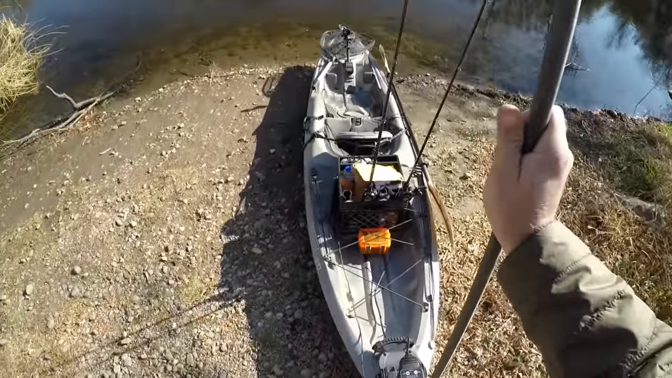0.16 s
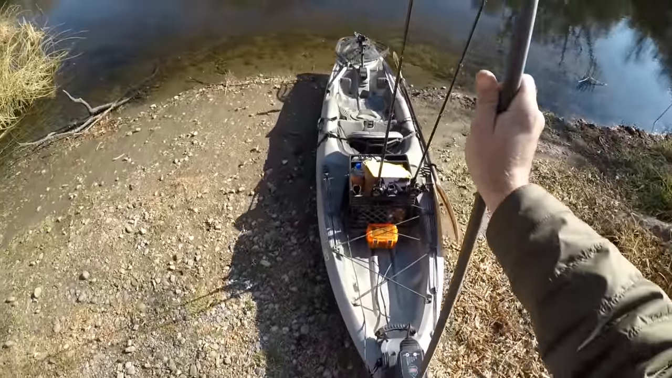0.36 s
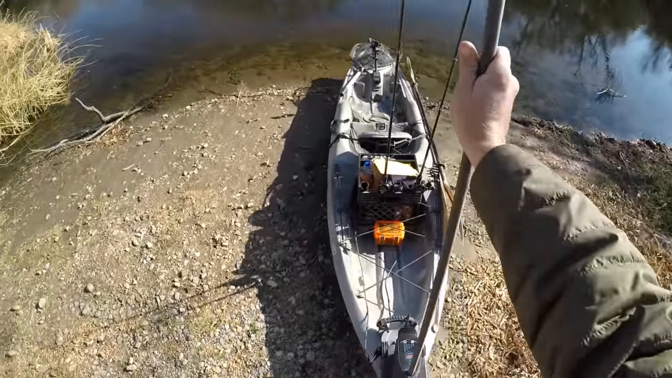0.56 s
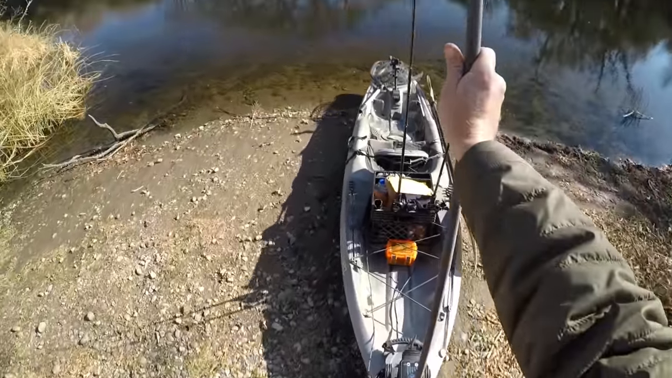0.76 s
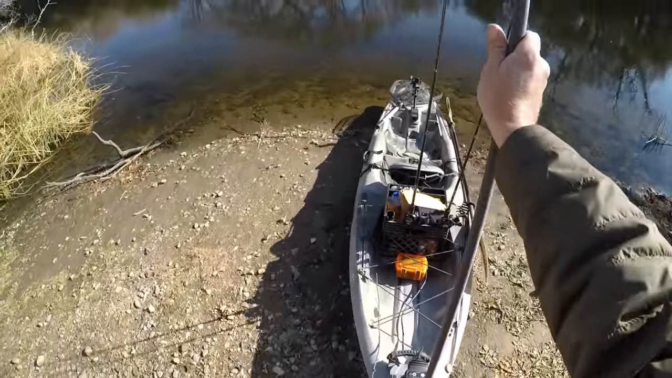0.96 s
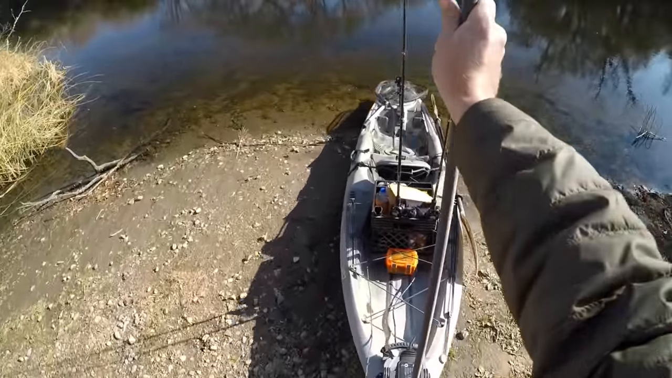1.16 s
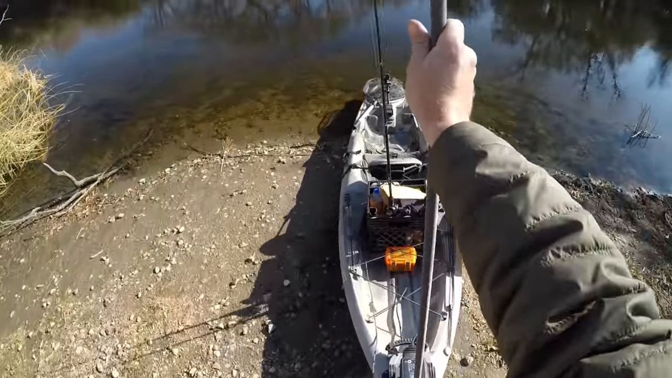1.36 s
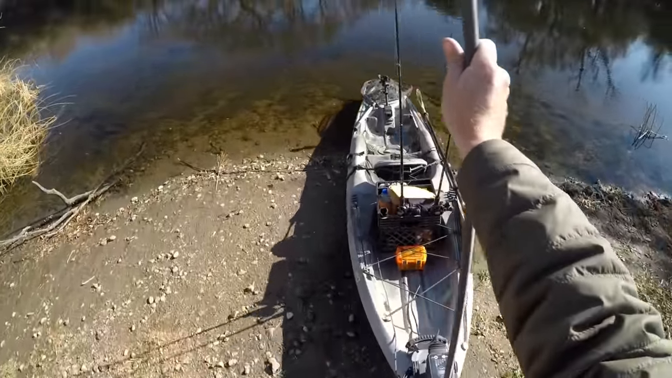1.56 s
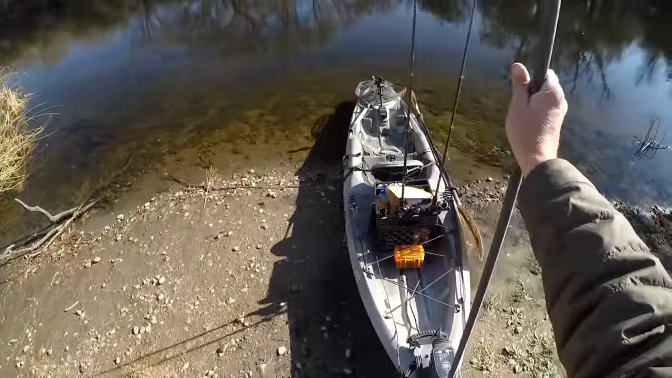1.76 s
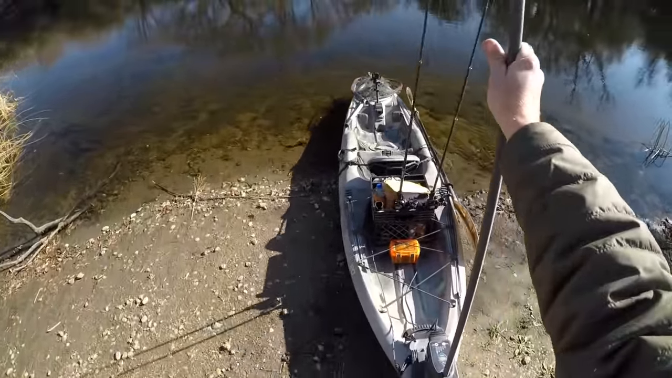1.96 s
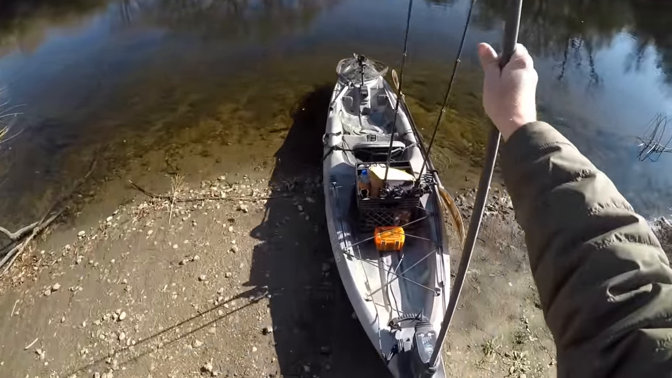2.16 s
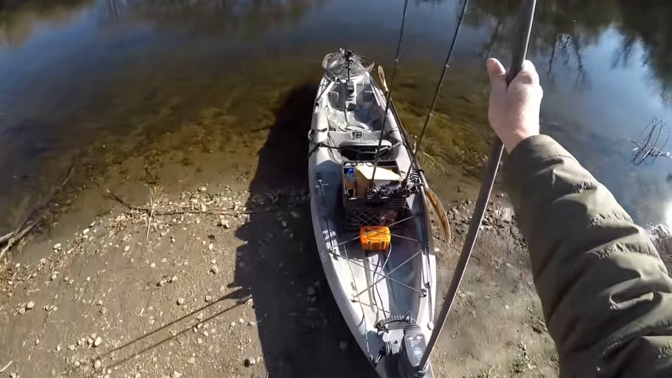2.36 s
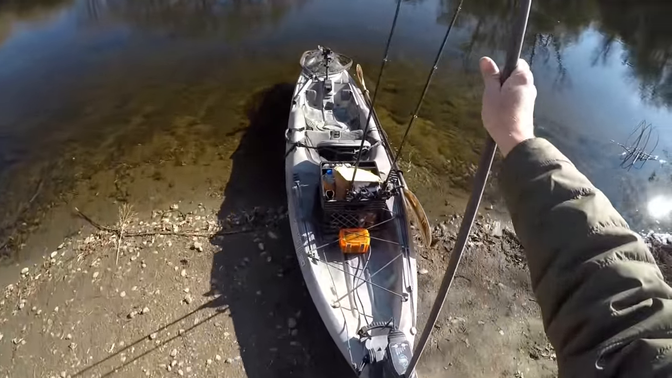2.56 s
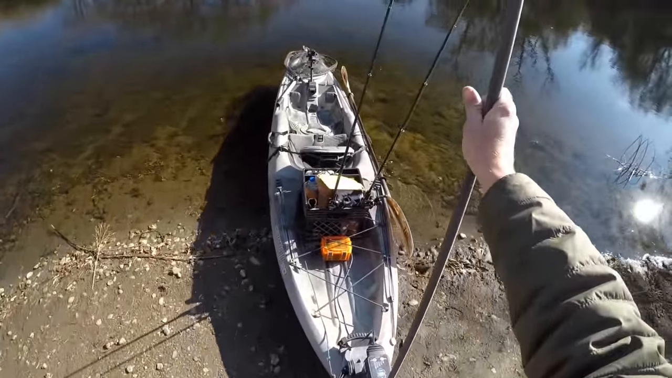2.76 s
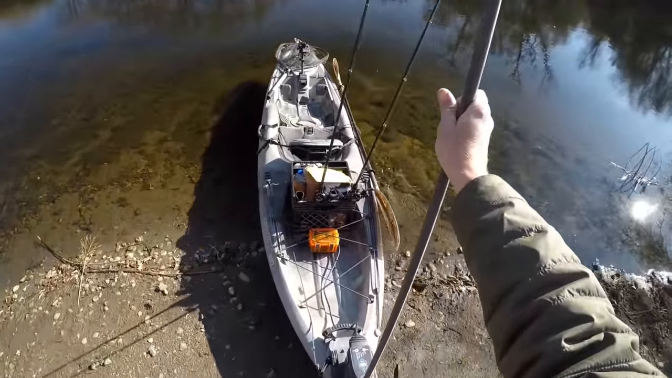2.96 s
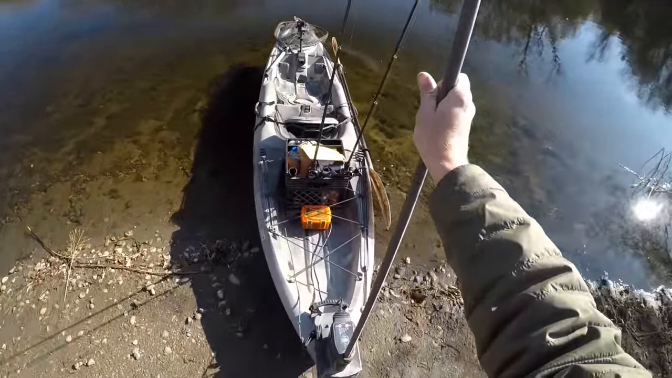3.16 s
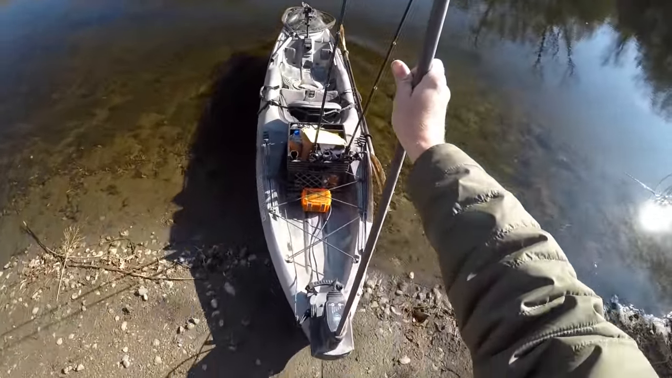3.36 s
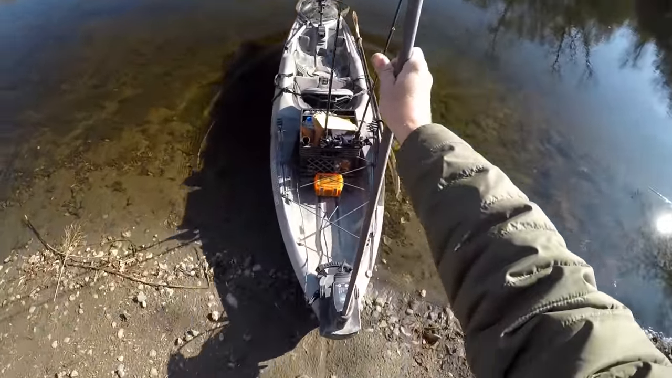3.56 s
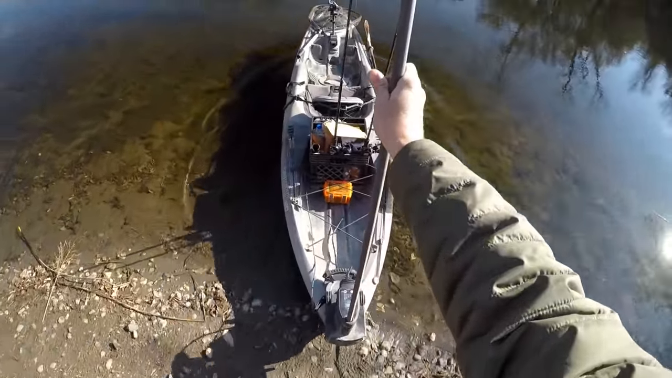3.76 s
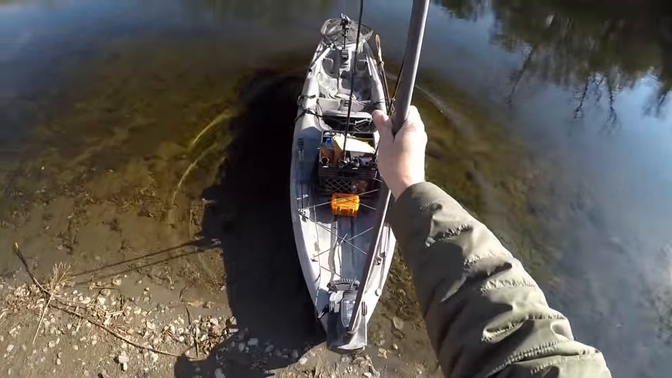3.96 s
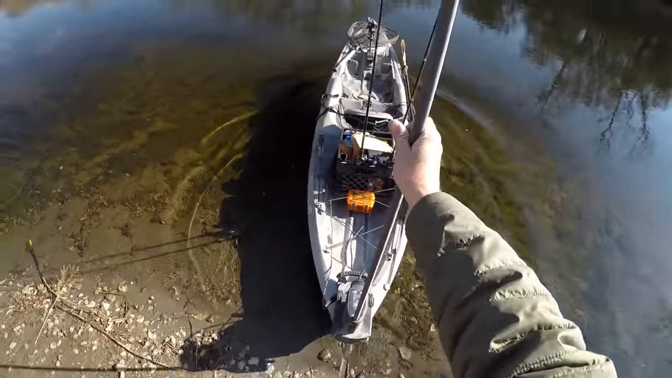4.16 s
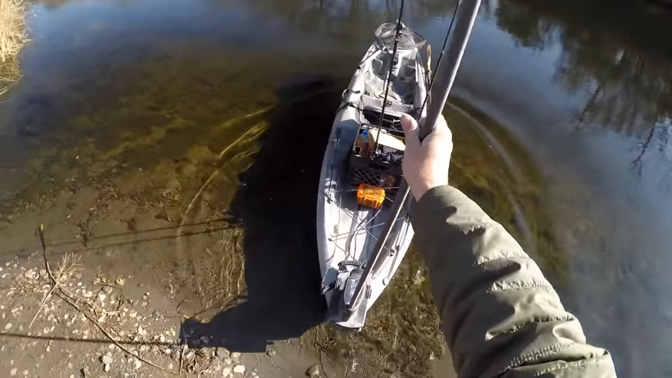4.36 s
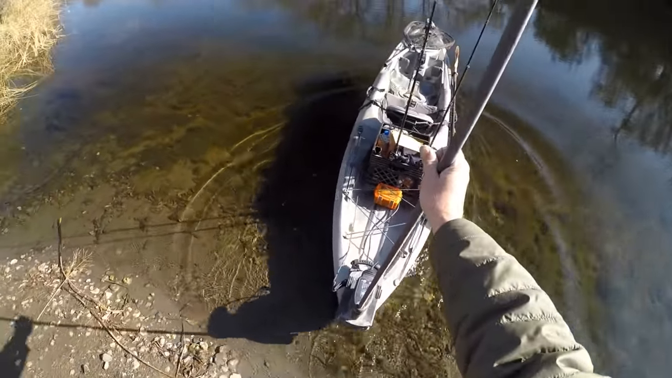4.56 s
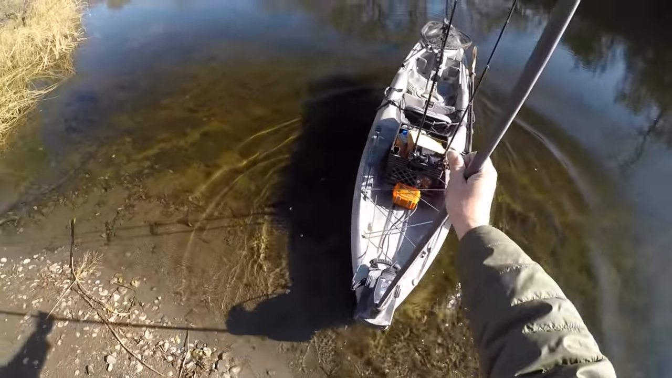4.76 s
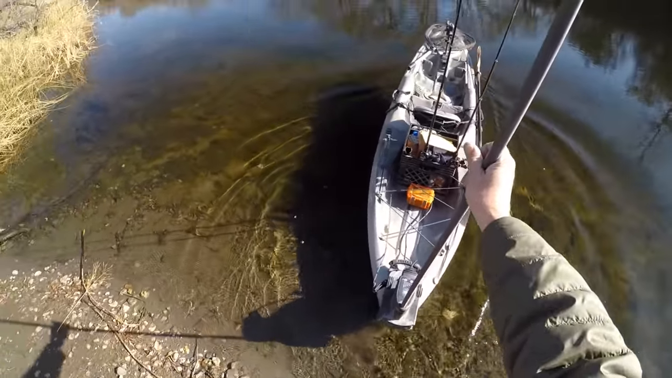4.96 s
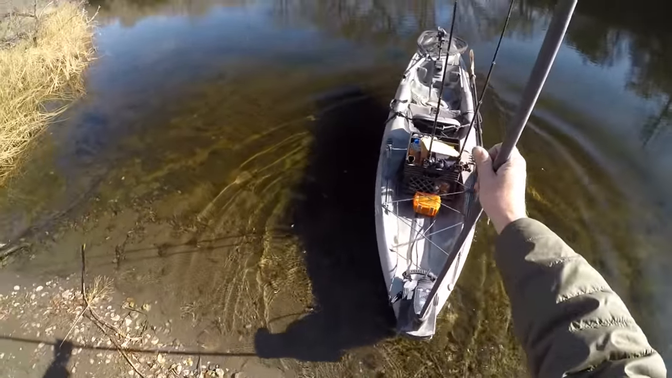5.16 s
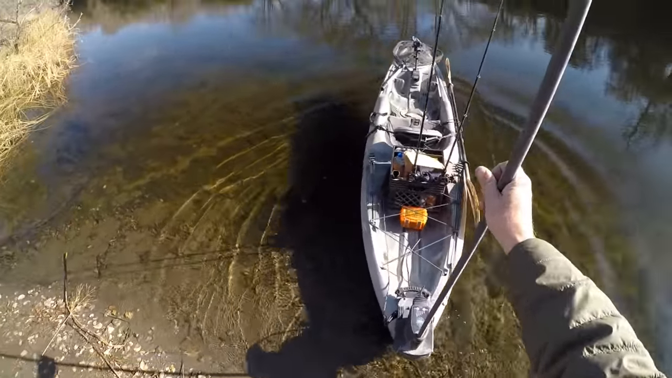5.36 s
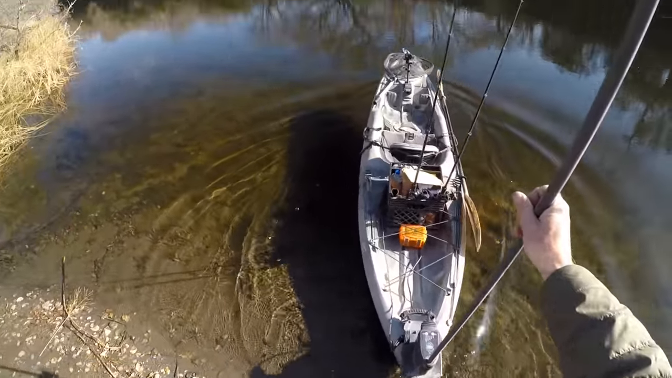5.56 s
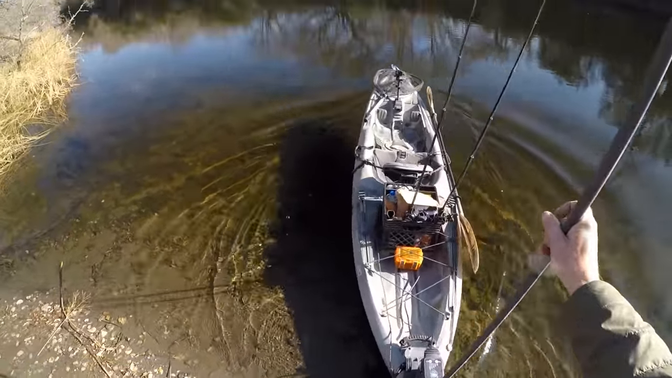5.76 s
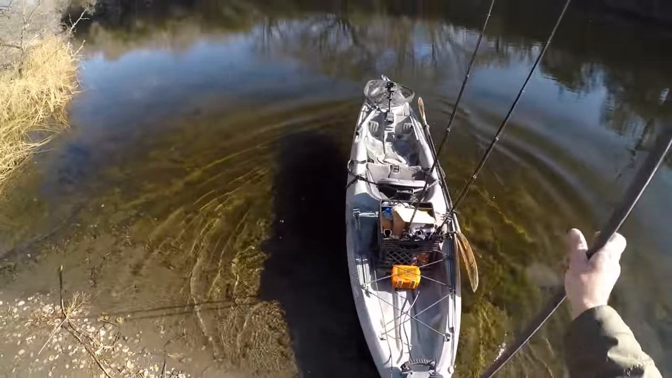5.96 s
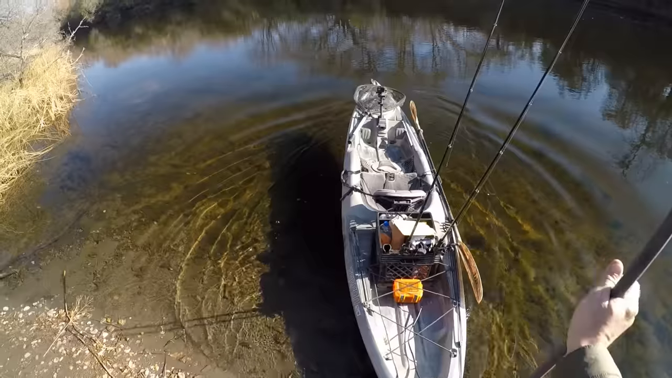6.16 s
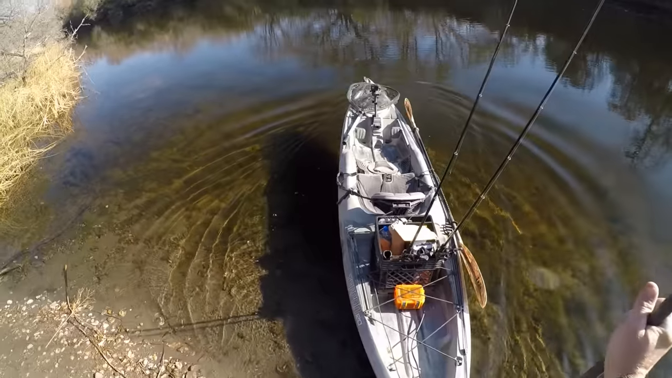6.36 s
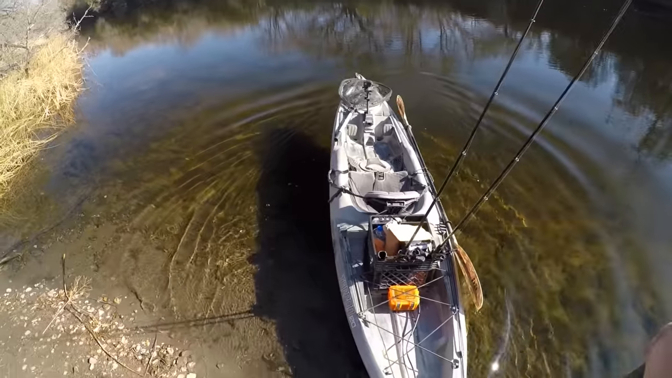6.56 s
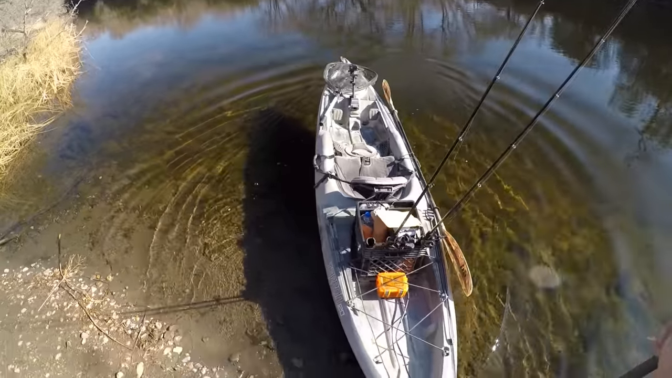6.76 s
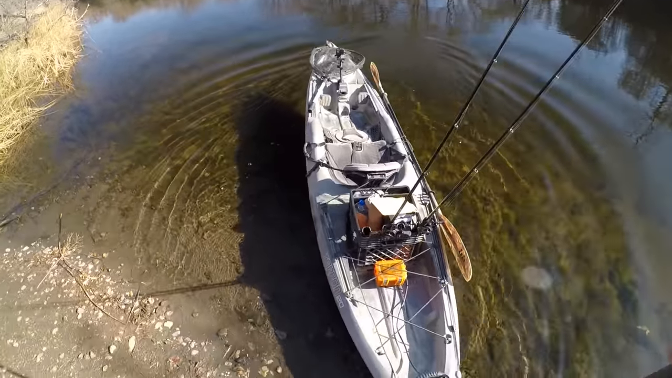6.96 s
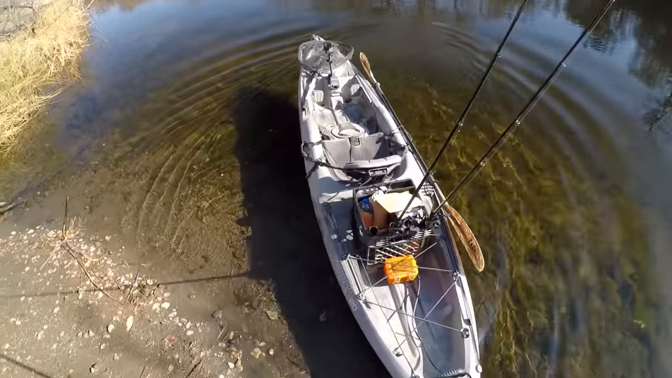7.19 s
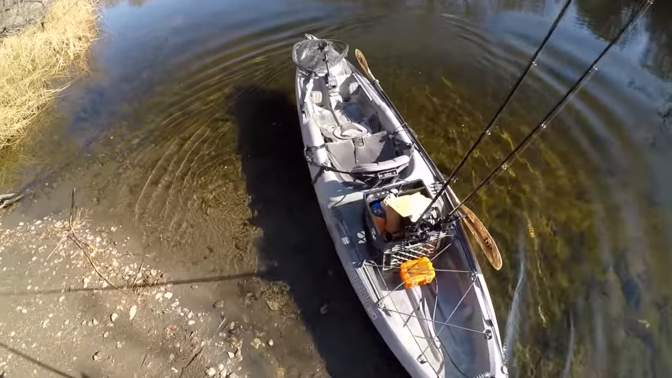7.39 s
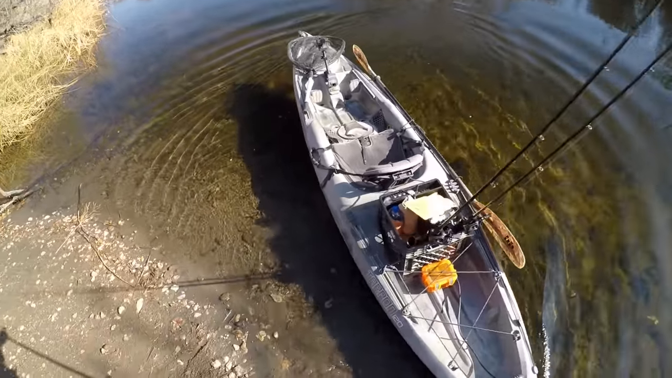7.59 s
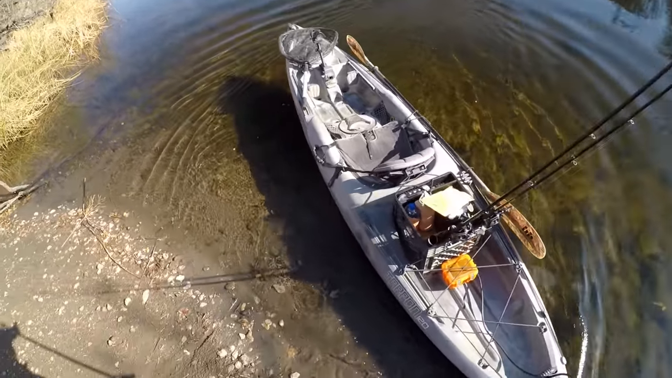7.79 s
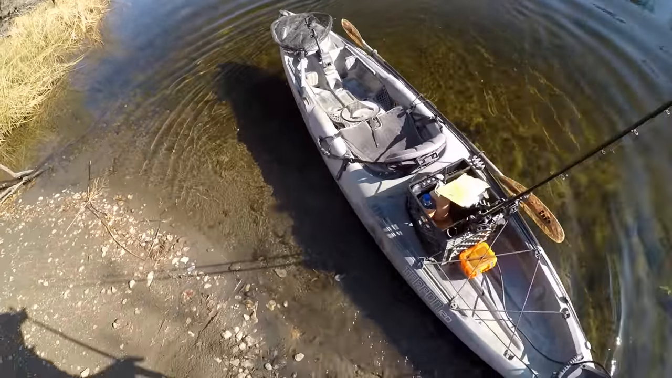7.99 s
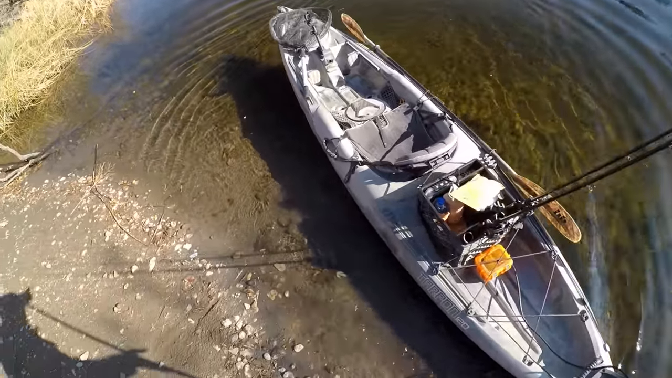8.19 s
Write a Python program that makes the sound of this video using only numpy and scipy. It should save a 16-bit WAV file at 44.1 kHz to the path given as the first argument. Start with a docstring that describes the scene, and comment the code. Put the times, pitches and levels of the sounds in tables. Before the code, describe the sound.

Close gritty scraping of a plastic boat shoved down a stony bank, with booming knocks, gives way to quiet bubbling water and light taps.

```python
"""Kayak launched over gravel

A plastic kayak is shoved over a gravel bank into a river, close to the microphone.
Random impacts drum on the modes of the hollow hull, crunch as filtered grit and hiss as sand.
A sleeve swishes as noise strokes and gear ticks as short bursts; plops, drips and gurgles are decaying
sines, hull knocks ring its modes, and a low hum wavers over the noise floor of the open air."""
import sys
import numpy as np
from scipy import signal
from scipy.fft import rfft, irfft
from scipy.io import wavfile
from scipy.ndimage import uniform_filter1d

SR = 44100
rng = np.random.default_rng(int(sys.argv[2]) if len(sys.argv) > 2 else 0)


def dump(signal):
    """Clip the signal to [-1, 1] and save it as 16-bit WAV at the path in sys.argv[1]."""
    limited = np.clip(np.atleast_2d(signal).T, -1, 1)
    pcm = np.round(limited * 32767).astype(np.int16)
    wavfile.write(sys.argv[1], SR, pcm)


N = 362807
TIME = np.arange(N) / SR


def gain_of(db):
    """Decibels to amplitude."""
    return 10 ** (np.asarray(db) / 20)


def evened(x):
    """Scales to rms 1."""
    return x / np.sqrt(np.mean(x ** 2) + 1e-20)


def peaked(x):
    """Scales to peak 1."""
    return x / (abs(x).max() + 1e-20)


def steadied(x, size=4000):
    """Holds the running rms at 1 while keeping the fine grain."""
    return x / np.sqrt(abs(uniform_filter1d(x ** 2, size)) + 1e-12)


def add(mix, s, sound):
    """Mixes a sound in at time s."""
    part = mix[max(round(s * SR), 0):][:len(sound)]
    part += sound[:len(part)]


def follow(breakpoints):
    """Straight lines through (time, value) points, over the whole scene."""
    return np.interp(TIME, *np.transpose(breakpoints))


def coloured(x, spectrum, size=4096):
    """Causal minimum-phase filter with the given spectrum, so that clicks keep their sharp fronts."""
    hz, db = np.transpose(spectrum)
    bin_hz = abs(np.fft.fftfreq(size, 1 / SR))
    log_gain = np.log(gain_of(np.interp(np.log(bin_hz + 1), np.log(hz), db)))
    taps = np.fft.ifft(np.exp(np.conj(signal.hilbert(log_gain)))).real
    return signal.oaconvolve(x, taps[:size // 2])[:len(x)]


def wander(hz):
    """Random drift of rms 1, up to about the given rate."""
    lowpass = np.exp(-(np.fft.rfftfreq(N, 1 / SR) / hz) ** 2)
    return evened(irfft(rfft(rng.standard_normal(N)) * lowpass, N))


def impacts(per_s, spread_db, cap=4):
    """Random one-sample impacts whose strengths spread exponentially in dB, up to a cap."""
    hits = (rng.random(N) < per_s / SR) * rng.choice([-1, 1], N)
    return hits * gain_of(spread_db * np.minimum(rng.exponential(1, N), cap))


def swell(start, length, rise_s, fall_s):
    """Attack, hold and release of one contact."""
    t = TIME - start
    return np.clip(t / rise_s, 0, 1) * np.exp(-np.maximum(t - length, 0) / fall_s)


def surging(steady, events, rise_s, fall_s):
    """A set of steady levels, with the power of each event on top."""
    power = sum(np.outer(gain_of(db), swell(start, length, rise_s, fall_s)) ** 2
                for start, length, *db in events)
    return np.sqrt(steady ** 2 + power)


def burst(spectrum, t60, rise_s=0.00008, size=4000):
    """A short crack of coloured, decaying noise with peak 1."""
    t = np.arange(size) / SR
    noise = rng.standard_normal(size) * gain_of(-60 * t / t60) * (1 - np.exp(-t / rise_s))
    return peaked(coloured(noise, spectrum))


def clack(hz, t60=0.016, spread=0.198, count=7, size=1500):
    """A cluster of close, quickly dying modes around one pitch."""
    t = np.arange(size) / SR
    modes = hz * np.exp(spread * rng.standard_normal((count, 1)))
    ring = (rng.choice([-1, 1], (count, 1)) * np.sin(2 * np.pi * modes * t)).sum(0)
    return peaked(ring * gain_of(-60 * t / t60))


def rattle(hz, count=3):
    """One clack, then a few weaker ones of other pitches close behind."""
    out = np.zeros(4000)
    add(out, 0, clack(hz, t60=0.018, spread=0.245, count=14))
    for late, pitch in rng.random((count, 2)):
        add(out, 0.011 * late, gain_of(-15) * clack(hz * 2 ** (1.3 * (pitch - .5))))
    return out


# low wavering drone of two tones: (frequency [Hz], relative level [dB], width [Hz])
HUM = [(135.5, -51.5, 2.6), (273, -52, 6.16)]
# slow fading of the drone: (time [s], level [dB])
FADE = [(4.7, -11), (5.15, -2), (5.45, -8), (5.65, -14.5), (6.1, -0.5), (6.35, -10), (6.53, -10),
        (6.8, -5.5), (7.4, -3.5), (8.2, -5)]
# colour of the open-air floor: (frequency [Hz], density [dB per Hz])
AIR = [(25, -20), (45, -36), (65, -8), (90, 7.5), (180, 4.5), (350, 5), (650, -14), (1500, -8.5),
       (3000, -15.5), (6000, -19.5), (10500, -21.5), (12500, -27)]


def air(drift=0.372):
    """Open-air noise floor with a low drone whose tones waver in pitch and level and fade."""
    hum = np.zeros(N)
    for hz, db, width in HUM:
        pitch = hz + drift * width * wander(width)
        tone = evened(np.sin(2 * np.pi * np.cumsum(pitch) / SR))
        hum += gain_of(db + 2 * wander(width)) * tone
    floor = gain_of(-55.0) * evened(coloured(rng.standard_normal(N), AIR))
    return hum * gain_of(follow(FADE)) + floor


# colour of stirred water: (frequency [Hz], density [dB per Hz])
WASH = [(150, -4.5), (380, 23.5), (900, 7), (1800, 8.5), (3500, 6), (6000, 4), (10000, -4.5), (12500, -27)]


def wash():
    """The stirred wake, a dense rain of impacts."""
    return evened(coloured(impacts(per_s=6000, spread_db=6.0), WASH))


# colour of the falling spray: (frequency [Hz], density [dB per Hz])
DROPLET = [(1500, -31), (3000, 0), (4500, -3), (7000, -2), (10000, -4.5), (13000, -18)]


def droplets(t60=0.006):
    """Fine spray from the wake falls back in tiny, separate ticks."""
    t = np.arange(400) / SR
    tick = rng.standard_normal(len(t)) * gain_of(-60 * t / t60)
    hits = signal.oaconvolve(impacts(per_s=38, spread_db=5.5, cap=2.8), tick)[:N]
    return gain_of(-9) * evened(coloured(hits, DROPLET))


def bubble(hz, t60, rise=0.09, onset_cycles=0.45):
    """A pocket of air rings and climbs by a share of its pitch as it nears the surface."""
    t = np.arange(0, t60, 1 / SR)
    turns = np.cumsum(hz * (1 + rise * t / t60)) / SR
    onset = 1 - np.exp(-turns / onset_cycles)
    return peaked(np.sin(2 * np.pi * turns) * gain_of(-60 * t / t60) * onset)


def patter(count=64):
    """Small bubbles at random; the smaller the bubble, the higher and shorter its ring."""
    out = np.zeros(N)
    for hz in np.geomspace(480, 5000, count):
        ring = (hz / 1000) ** -.15 * bubble(hz, 0.045 * (hz / 1000) ** -.5, rise=0.11)
        out += signal.oaconvolve(impacts(per_s=16, spread_db=6.0, cap=2.94), ring)[:N]
    # each wavelet frees a cluster of bubbles
    return steadied(out, size=9000) * gain_of(2.5 * wander(hz=30.0))


def glug(hz, hold, t60, size=8000):
    """A trapped pocket of air drops onto its pitch, rings on briefly and is let go, with an overtone."""
    t = np.arange(size) / SR
    turns = np.cumsum(hz * (1 + 0.14 * np.exp(-t / 0.006))) / SR  # starts sharp and settles
    ring = np.sin(2 * np.pi * turns) * gain_of(-60 * np.maximum(t - hold, 0) / t60)
    overtone = np.sin(2 * np.pi * 1.92 * hz * t) * gain_of(-60 * t / 0.034)
    return (ring + overtone) * (1 - np.exp(-2 * turns))


def spatter(length, hz, per_s=300, octaves=0.45):
    """A wavelet collapses into a quick crowd of tiny bubbles around one pitch."""
    out = np.zeros(round(length * SR) + 2000)
    for late, pitch, strength in rng.random((int(length * per_s) + 1, 3)):
        bubble_hz = hz * 4 ** (octaves * (2 * pitch - 1) * 0.84)
        add(out, late * length, gain_of(-10 * strength) * bubble(bubble_hz, t60=0.022))
    return peaked(out)


def plop(ring, hz):
    """A ring of air with the splat and spray of the water that closes over it."""
    out = np.zeros(10000)
    add(out, 0, ring)
    add(out, 0, gain_of(-9) * clack(hz, t60=0.045, spread=0.5, count=24, size=2500))
    add(out, 0, gain_of(-13) * burst(WASH, t60=0.039))
    return out


# air pockets and drips: (time [s], relative level [dB], starting pitch [Hz], ring time t60 [s])
BUBBLES = [(4.465, -37, 1050, 0.074), (4.788, -38, 446, 0.068), (5.093, -37.5, 400, 0.056),
           (5.273, -40, 420, 0.035), (5.529, -38.5, 1260, 0.033), (5.654, -36.5, 1710, 0.023),
           (5.673, -39, 1450, 0.05), (5.720, -37, 770, 0.046), (5.812, -36.5, 607, 0.04),
           (6.109, -36, 2060, 0.025), (6.148, -22, 1070, 0.022), (6.178, -39, 1500, 0.038),
           (6.374, -29.5, 1870, 0.025), (6.445, -33, 2220, 0.02), (6.514, -42, 1950, 0.044),
           (6.473, -39, 368, 0.26), (6.562, -44, 1050, 0.056), (6.58, -40, 464, 0.06),
           (6.732, -38, 780, 0.061), (6.767, -41, 1530, 0.035), (6.795, -44, 915, 0.05),
           (6.82, -39, 2680, 0.028), (6.827, -37.5, 1870, 0.033), (6.915, -39.5, 1860, 0.04),
           (6.946, -42, 2820, 0.03), (7.004, -42, 356, 0.098), (7.228, -45, 2950, 0.03),
           (7.378, -42, 1320, 0.05), (7.461, -37, 1257, 0.097), (7.489, -39, 1780, 0.038),
           (7.513, -35, 876, 0.058), (7.546, -40, 1640, 0.058), (7.583, -37.5, 2680, 0.038),
           (7.804, -38.5, 1360, 0.037), (7.824, -37, 660, 0.063), (7.880, -32, 1570, 0.041),
           (7.911, -46, 1260, 0.039), (8.002, -41.5, 1680, 0.063), (8.110, -37, 890, 0.046)]
# air trapped against the hull: (time [s], relative level [dB], settled pitch [Hz], hold [s], t60 [s])
GLUGS = [(4.539, -22, 378, 0.019, 0.037), (5.905, -28, 559, 0.009, 0.035), (6.089, -25, 562, 0.013, 0.033),
         (6.143, -33.5, 777, 0.01, 0.11), (6.213, -35, 563, 0.017, 0.08), (7.64, -28.5, 787, 0.0045, 0.016),
         (7.852, -34, 720, 0.0031, 0.032), (7.909, -41, 500, 0.0072, 0.055)]
# spatters of tiny bubbles: (start [s], length [s], relative level [dB], centre pitch [Hz])
SPATTERS = [(5.708, 0.032, -46, 3340), (6.301, 0.055, -40, 1910), (6.419, 0.053, -39, 1730),
            (6.743, 0.035, -40, 1240), (6.991, 0.069, -38.5, 1500), (7.428, 0.018, -38.5, 1870),
            (7.473, 0.045, -43, 1590), (7.683, 0.019, -42, 1800), (7.899, 0.03, -40, 1680)]


def plops():
    """Air pockets, drips and glugs, each closed over by water, and spatters of tiny bubbles."""
    out = np.zeros(N)
    for s, db, hz, t60 in BUBBLES:
        add(out, s, gain_of(db) * plop(bubble(hz, t60), hz))
    for s, db, hz, hold, t60 in GLUGS:
        add(out, s, gain_of(db) * plop(glug(hz, hold, t60), hz))
    for s, length, db, hz in SPATTERS:
        add(out, s, gain_of(db) * spatter(length, hz))
    return out


# colour of the splash: (frequency [Hz], density [dB per Hz])
SPLASH = [(35, -50), (85, -25), (135, 8.5), (550, 2), (720, -6), (1200, -16), (1800, -4), (2600, -21),
          (4000, -16.5), (6000, -28), (10000, -28), (13000, -60)]


def splash():
    """A wavelet breaks against the side in one short swell of noise."""
    noise = evened(coloured(impacts(per_s=2000, spread_db=4.0), SPLASH))
    return gain_of(-30) * noise * swell(start=6.222, length=0.037, rise_s=0.0017, fall_s=0.02)


# stir of the water: (time [s], level [dB])
WAKE = [(3.4, -78), (3.85, -46), (4.45, -49.5), (5.03, -55), (5.18, -61), (5.55, -59.5), (5.7, -56),
        (6.15, -50), (6.4, -52), (6.7, -56), (7.02, -61), (7.12, -63.5), (7.36, -62), (7.5, -56),
        (7.74, -58), (7.89, -53), (8.0, -60.5), (8.23, -58.5)]
# few bubbles form before the boat is pushed clear: time [s], level until then [dB]
AFLOAT_S, AGROUND_DB = 5.62, -7


def water():
    """Plops, a splash, and the wake's bubbles, spray and wash, echoed by hull and bank."""
    bubbling = gain_of(2.0) * patter() + droplets()
    bubbling = bubbling * gain_of(np.where(TIME < AFLOAT_S, AGROUND_DB, 0))
    wake = gain_of(follow(WAKE)) * (bubbling + gain_of(-1.0) * wash())
    direct = gain_of(-2.0) * plops() + splash() + wake
    echo = burst([(100, 17.0), (600, -1.5), (8000, -9.5)], t60=0.24)
    echoed = signal.oaconvolve(direct, echo / np.linalg.norm(echo))[:N]
    add(direct, .004, gain_of(-9) * echoed)
    return direct


# a gap under the hull fills with water, so its ring climbs: (time [s], pitch [Hz], relative level [dB])
GURGLE = [(6.479, 378, -54), (6.55, 413, -62), (6.59, 474, -40), (6.615, 520, -47), (6.675, 595, -49.5),
          (6.765, 680, -47.5), (6.83, 780, -67)]


def gurgle(count=36, per_s=100, octaves=0.05):
    """An uneven chain of small gulps whose pitch follows the closing air gap."""
    out = np.zeros(N)
    s, hz, db = np.transpose(GURGLE)
    for k, (late, pitch, strength) in enumerate(rng.uniform(-0.998, 1, (count, 3))):
        at = s[0] + (k + late) / per_s
        gulp = bubble(np.interp(at, s, hz) * 2 ** (octaves * pitch), t60=0.08)
        add(out, at, gain_of(np.interp(at, s, db) + 4.6 * strength) * gulp)
    return out


# swishes of the sleeve: (time of the top [s], rms level there [dB], Gaussian width [s])
SWISHES = [(4.475, -69, 0.011), (4.652, -47, 0.0092), (4.732, -40, 0.013), (4.98, -39, 0.028),
           (5.07, -51.5, 0.017)]
# colour of rubbing cloth: (frequency [Hz], density [dB per Hz])
CLOTH = [(290, -22), (500, -7), (657, -4), (1200, -1), (1350, -6), (1880, 0), (5010, -8.5), (10700, -18),
         (13000, -36)]


def sleeve():
    """Fibres of the jacket rub in short strokes, each a bell-shaped swell of dense impacts."""
    strokes = sum(gain_of(db) * np.exp(-.5 * ((TIME - s) / width) ** 2) for s, db, width in SWISHES)
    return strokes * evened(coloured(impacts(per_s=6800, spread_db=2.0), CLOTH))


# sharp ticks of gear, flicked grit and spray: (time [s], relative level [dB])
TICKS = [(0.203, -21.5), (0.769, -21.5), (0.845, -22), (1.067, -24.5), (1.215, -18.5), (1.501, -17.5),
         (1.6762, -18), (3.912, -14.5), (3.966, -18), (4.481, -27.5), (4.833, -19.5), (5.2352, -27.5),
         (6.148, -25)]
# colour of a tick: (frequency [Hz], density [dB per Hz])
TICK = [(600, 9), (1500, -1), (3500, 8.5), (6000, 1), (8000, 8.5), (11500, 3), (13000, -12)]
# clacks of single stones and splats of drops: (time [s], relative level [dB], centre pitch [Hz])
CLACKS = [(0.212, -14, 3320), (0.213, -14.5, 1250), (0.489, -19, 690), (0.561, -21, 930),
          (0.696, -21, 2850), (0.697, -20, 1320), (0.843, -22, 1120), (0.843, -17.5, 4100),
          (0.917, -18, 774), (1.134, -13.5, 950), (1.157, -13.5, 745), (1.236, -19, 3000), (1.242, -8, 875),
          (1.248, -17, 1930), (1.265, -22, 2400), (1.278, -24, 1680), (1.31, -22, 1190), (1.381, -16, 1020),
          (1.589, -25, 915), (1.887, -31, 1080), (1.985, -16, 1020), (1.985, -15.5, 2900),
          (2.112, -20, 1400), (2.639, -20, 2460), (2.743, -21, 2360), (2.862, -34, 1420), (2.988, -26, 730),
          (3.223, -18, 1090), (3.426, -21, 720), (3.574, -25, 1270), (3.631, -17, 1720), (3.632, -14, 4440),
          (3.697, -16, 1170), (3.831, -22, 1680), (3.856, -32, 1690), (3.881, -19, 2970),
          (3.911, -22, 3160), (3.953, -17, 1610), (4.009, -27, 1000), (4.031, -21, 1290),
          (4.034, -12.5, 710), (4.032, -13, 3170), (4.089, -23, 800), (4.125, -32, 1190),
          (4.184, -22, 1490), (4.185, -25, 4000), (4.218, -23, 1600), (4.241, -25.5, 3500),
          (4.325, -28, 3330), (4.365, -24.5, 1970), (4.464, -30, 3680), (4.541, -15, 610),
          (5.526, -31.5, 4620), (5.749, -23, 4230), (6.087, -32, 3120), (6.149, -23.5, 3900),
          (6.455, -25.5, 4080), (6.219, -29, 1110), (6.856, -26, 2230), (7.402, -34, 4570),
          (7.511, -36, 3000), (7.654, -26.5, 1870), (7.342, -23, 3400)]


def ticks():
    """Bright, dry noise ticks near the microphone, and ringing clacks from the shore and the water."""
    out = np.zeros(N)
    for s, db in TICKS:
        add(out, s, gain_of(db) * burst(TICK, t60=0.02, rise_s=0.0008))
    for s, db, hz in CLACKS:
        add(out, s, gain_of(db - 1.7) * rattle(hz))
    return gain_of(-4.5) * out


# modes of the free hull: (frequency [Hz], level [dB], ring time t60 [s])
HULL = [(76.6, -12, 0.068), (102.9, -4, 0.32), (140, -4.5, 0.38), (164, 3, 0.15), (202, 3, 0.11),
        (238, -0.5, 0.19), (273.8, -1, 0.11), (297.3, 0, 0.16), (337.1, -2, 0.16), (397, 3.5, 0.098),
        (440.6, 0, 0.19), (494, 3, 0.056), (526.6, 1, 0.11), (657, 2, 0.05), (782, -4.5, 0.08),
        (884, -2, 0.038), (1320, -17, 0.0085), (1565, -14, 0.059), (1820, -24, 0.016)]


def hull_ring(weights, detune=0.035, size=9000):
    """Ring of the hull struck at one spot, which weights its modes and, by its load, shifts them a little."""
    t = np.arange(size) / SR
    hz, db, t60 = np.transpose(HULL)[:, :, None]
    hz = hz * (1 + detune * rng.standard_normal(hz.shape))
    modes = gain_of(db - 60 * t / t60) * np.sin(2 * np.pi * hz * t)
    return (weights[:, None] * modes).sum(0)


# blows from stones and later from ripples and gear:
# (time [s], relative level [dB], centre of the blow [Hz], crack level re ring [dB])
KNOCKS = [(0.211, -17.5, 403, -4.5), (0.561, -17, 288, -18), (1.133, -11.5, 480, -12),
          (1.157, -3, 256, -36), (1.16, -7.5, 650, -32), (1.177, -7.5, 410, -37), (1.186, -10, 500, -32),
          (1.208, -13, 124, -32), (1.247, -6.5, 352, -7.5), (1.263, -11, 280, -9), (1.975, -15, 254, -18),
          (1.984, -17, 320, 4.5), (3.427, -17, 284, -20), (3.535, -15, 220, -20), (3.578, -10.5, 290, -13),
          (3.745, -13, 170, -28), (3.829, -20.5, 615, 4), (3.84, -5, 405, -40), (3.952, -9, 390, -10),
          (3.975, -4, 296, -20), (4.034, -3.5, 455, -19), (4.089, -13, 180, -13), (4.011, -14.5, 420, -20),
          (4.128, -12, 235, -19), (4.141, -11.5, 380, -17), (4.540, -24.5, 305, -30),
          (4.573, -29, 290, -16), (4.654, -27, 197, -0.5), (4.695, -28, 98, -29), (4.829, -30, 355, -9),
          (5.043, -34, 397, 7.5), (5.906, -30, 262, -8), (5.93, -30.5, 352, -10), (6.218, -23.5, 270, 0.5),
          (6.248, -25, 230, -4), (7.642, -19.5, 265, -9), (7.673, -28, 292, -22), (7.802, -32, 430, -16),
          (7.856, -23, 270, -11), (7.909, -30, 325, -6), (8.001, -30.5, 274, -12)]
# what the shell radiates of a blow: (frequency [Hz], gain [dB])
BLOW = [(30, -43), (52, -17), (85, 3), (150, 4.5), (900, 0.5), (4000, -30)]
KNOCK_DAMPING_PER_S = 48  # ground and water damp the struck shell


def knocks(octaves=0.47, scatter=0.38):
    """Each blow rings the hull modes near its own pitch, with a gritty crack."""
    out, mode_hz = np.zeros(N), np.array(HULL)[:, 0]
    for s, db, hz, crack_db in KNOCKS:
        nearness = 1 / (1 + (np.log2(mode_hz / hz) / octaves) ** 2)
        weights = (1 + scatter * rng.standard_normal(len(HULL))) * nearness
        ring = hull_ring(weights * rng.choice([1, 1, -1], len(HULL)))
        damping = np.exp(-KNOCK_DAMPING_PER_S * np.arange(len(ring)) / SR)
        add(out, s, gain_of(db) * peaked(coloured(ring * damping, BLOW)))
        add(out, s, gain_of(db + crack_db) * burst(GRIT, t60=0.03))
    return gain_of(-2.5) * out


# the glide down the bank:
# (time [s], crunch of gravel, relative level [dB], hiss of sand and dry grass, relative level [dB])
SLIDE = [(0.0, -46.5, -53.5), (0.17, -40, -56), (0.29, -38.5, -50.5), (0.55, -35.5, -47.5),
         (0.74, -39.5, -51.5), (0.88, -40, -50.5), (1.05, -41, -56), (1.37, -39.5, -53),
         (1.47, -35.5, -48.5), (1.84, -37.5, -44.5), (2.03, -44.5, -50), (2.15, -39.5, -44.5),
         (2.25, -42.5, -48.5), (2.42, -46, -53.5), (2.74, -37.5, -48.5), (2.84, -43, -60),
         (2.98, -36.5, -49), (3.38, -42.5, -50.5), (3.72, -39.5, -47), (3.81, -53, -62), (4.1, -41.5, -74),
         (4.23, -43, -71), (4.45, -61, -68)]
STOP_DB_PER_S = 254  # the scrape dies as the stern floats free


def slide_gains():
    """Levels of gravel and of sand under the gliding hull."""
    s, *levels = np.transpose(SLIDE)
    stop_db = STOP_DB_PER_S * np.maximum(TIME - s[-1], 0)
    return gain_of(np.array([np.interp(TIME, s, db) for db in levels]) - stop_db)


def catches(count=100, per_s=17, middle_hz=1910):
    """Single stones snag and clack under the hull at uneven intervals, harder where it presses more."""
    out = np.zeros(N)
    for k, (late, pitch, strength) in enumerate(rng.uniform(-1, 1, (count, 3))):
        add(out, (k + late) / per_s, gain_of(-5.5 + 4.5 * strength) * rattle(middle_hz * 2 ** pitch))
    return out * slide_gains()[0]


def scratch(length, hz, slips_per_s=1100, width=0.34, glide=0.17):
    """A stone sticks and slips along the plastic, ringing at a pitch that slides as it rolls."""
    t = np.arange(0, length + 0.0033, 1 / SR)
    slips = rng.standard_normal(len(t)) * (rng.random(len(t)) < slips_per_s / SR)
    slips = slips * np.sqrt(np.maximum(1 - t / length, 0))
    pitch = hz * (1 + glide * rng.uniform(-1.36, 1) * (t / length - .5))
    turn = np.exp(2j * np.pi * np.cumsum(pitch) / SR)
    # a double-pole resonance that follows the sliding pitch
    pole = np.exp(-np.pi * width * hz / SR)
    return evened((turn * signal.lfilter([1], np.poly([pole, pole]), slips / turn)).real)


# sharp stones score the plastic: (start [s], length [s], rms level [dB], middle pitch [Hz])
SCRATCHES = [(1.626, 0.02, -39, 1400), (1.721, 0.019, -33, 885), (1.748, 0.041, -43.5, 3600),
             (1.886, 0.02, -39.5, 3370), (3.428, 0.027, -35.5, 660), (3.453, 0.015, -39, 1570),
             (3.858, 0.015, -37, 890), (3.933, 0.032, -37, 1480), (4.387, 0.03, -39.5, 560)]


def scratches(count=115, per_s=26, middle_hz=1400, longest_s=0.08):
    """The clear scratches, among many lesser ones that follow the weight on the gravel."""
    clear, lesser = np.zeros((2, N))
    for s, length, db, hz in SCRATCHES:
        add(clear, s, gain_of(db) * scratch(length, hz))
    for k, (late, pitch, strength, stroke) in enumerate(rng.uniform(-1, 1, (count, 4))):
        sound = scratch(longest_s * 2 ** (stroke - 1), middle_hz * 2 ** (1.3 * pitch))
        add(lesser, (k + late) / per_s, gain_of(-9.5 + 4.2 * strength) * sound)
    return clear + lesser * slide_gains()[0]


def passing(count, reach_s=0.24):
    """Stone after stone comes under the hull, chatters along it and is left behind."""
    middles = (np.arange(count) + rng.random(count)) / count * SLIDE[-1][0]
    return [impacts(per_s=90, spread_db=1.5) * np.maximum(1 - ((TIME - s) / reach_s) ** 2, 0) ** 2
            for s in middles]


# colour of the drumming: (frequency [Hz], gain [dB])
DRUM = [(25, -22), (48, -51), (75, -6.5), (120, -2.5), (300, 4.5), (520, -1), (800, -2.5), (1400, 6),
        (3000, -52)]
# the hull rides up on a bed of stones: (start [s], length [s], thud of its bottom,
# boom of its belly, clatter of its panels, each a relative level [dB])
RIDES = [(0.132, 0.62, -34, -33.5, -43), (0.366, 0.17, -34, -29.5, -33), (0.831, 0.091, -31.5, -28, -35),
         (1.156, 0.15, -25.5, -30.5, -30), (1.29, 0.36, -30, -32, -37), (1.603, 0.24, -25, -34, -31),
         (2.163, 0.21, -30, -36.5, -39), (2.73, 0.073, -38, -32, -34.5), (2.811, 0.13, -24.5, -26, -34),
         (3.433, 0.19, -35.5, -25, -35), (3.701, 0.073, -23, -38, -32.5), (3.825, 0.16, -27, -28.5, -32),
         (4.072, 0.16, -24, -29.5, -33), (4.217, 0.18, -28.5, -36.5, -37)]
THUD_HZ, BOOM_HZ = 136.5, 395.4  # upper edges of the thud and the boom


def hull_band(drum, hz, side):
    """One part of the hull: a band of the drumming held at an even level."""
    return steadied(signal.sosfilt(signal.butter(5, hz, side, fs=SR, output="sos"), drum), size=3000)


def drumming(stones):
    """Each contact spot rings its own mix of modes: the bottom thuds, the belly booms, the panels clatter."""
    spots = sum(signal.oaconvolve(spot, hull_ring(rng.standard_normal(len(HULL))))[:N] for spot in stones)
    drum = coloured(spots, DRUM)
    bottom = hull_band(drum, THUD_HZ, "low")
    belly = hull_band(drum, [THUD_HZ, BOOM_HZ], "band")
    panels = hull_band(drum, BOOM_HZ, "high")
    steady = np.outer(gain_of([-1, 5, 0]), slide_gains()[0])  # thud, boom, clatter
    thud, boom, clatter = surging(steady, RIDES, rise_s=0.027, fall_s=0.026)
    return gain_of(-2.5) * bottom * thud + gain_of(0.34) * belly * boom + gain_of(0.5) * panels * clatter


# colour of dry grit: (frequency [Hz], density [dB per Hz])
GRIT = [(300, -29), (600, 10), (900, 3.5), (1400, 8), (2100, 0.5), (3200, -2), (4600, -10), (6500, -46),
        (12500, -20)]
# ring of wet shingle: (frequency [Hz], width [Hz], level [dB])
SHINGLE = [(1446, 28, 18), (1820, 360, 12), (2270, 260, 5.4), (2410, 200, 10.6), (3200, 370, 4),
           (4900, 330, 5)]
# how far wet shingle at the waterline replaces loose pebbles: (time [s], share [0-1])
WET = [(2.15, 0), (2.5, 1), (3.35, 1), (3.7, 0.4), (4.4, 0)]


def crunch(stones, judder):
    """Juddering grit with loose pebbles clacking on the dry bank and resonant shingle at the waterline."""
    grit = evened(impacts(per_s=3500, spread_db=-1.0)) + 0.07 * evened(sum(stones))
    grit = grit * gain_of(1.1 * judder)
    pebbles = np.zeros(N)
    for hz in np.geomspace(800, 4600, 30):
        hits = impacts(per_s=8.8, spread_db=4.0)
        pebbles += signal.oaconvolve(hits, clack(hz) * (hz / 1000) ** -.7)[:N]
    ring = sum(gain_of(db) * signal.lfilter(*signal.iirpeak(hz, hz / width, SR), grit)
               for hz, width, db in SHINGLE)
    wet = np.clip(follow(WET), 0, 1)
    dry_grit = evened(coloured(grit, GRIT))
    return steadied(dry_grit + 0.65 * (1 - wet) * evened(pebbles) + 1.35 * wet * evened(ring))


# colour of sand: (frequency [Hz], density [dB per Hz])
SAND = [(2000, 4), (4500, 8), (6500, 1), (8500, 1.5), (10000, 0.5), (11200, -6), (12300, -13), (13300, -50)]


def hiss(judder):
    """Sand under the hull: very dense, bright impacts that flutter with the judder."""
    flutter = gain_of(judder + 1.1 * wander(hz=70))
    return steadied(coloured(impacts(per_s=9000, spread_db=2.5) * flutter, SAND))


# the keel digs in and ploughs up gravel:
# (start [s], length [s], crunch, relative level [dB], hiss, relative level [dB])
DIGS = [(1.235, 0.059, -34, -48), (1.461, 0.068, -35, -45), (2.863, 0.074, -37, -44),
        (3.236, 0.063, -38.5, -51), (3.645, 0.028, -55, -43.5), (3.821, 0.071, -41, -48),
        (3.896, 0.07, -36, -43)]


def scrape(count=42):
    """Stones catch and slip at several spots under the hull; each slip drums the shell and crunches grit."""
    judder = wander(hz=52.7)
    stones = passing(count)
    gravel, sand = surging(slide_gains(), DIGS, rise_s=0.005, fall_s=0.0048)
    uneven = gain_of(1.08 * wander(hz=9.2))  # the ground is lumpy
    ground = crunch(stones, judder) * gravel + gain_of(4.5) * hiss(judder) * sand
    return uneven * (drumming(stones) + ground)


def scene():
    """All sources at one microphone."""
    surroundings = air() + water() + gurgle() + sleeve() + ticks()
    hull = knocks() + catches() + scratches() + scrape()
    return (surroundings + hull)[None]


def record(dry, low_hz=52, top_hz=11600, edge_hz=13300):
    """Removes the deepest bass and the highest treble; then the band limit."""
    thinned = signal.sosfilt(signal.butter(2, low_hz, "high", fs=SR, output="sos"), dry)
    dulled = signal.sosfilt(signal.butter(6, top_hz, fs=SR, output="sos"), thinned)
    band_limit = signal.firwin(255, edge_hz, window=("kaiser", 9), fs=SR)
    return signal.oaconvolve(dulled, band_limit[None], "same")


dry = scene()
out = record(dry)
dump(out)
```